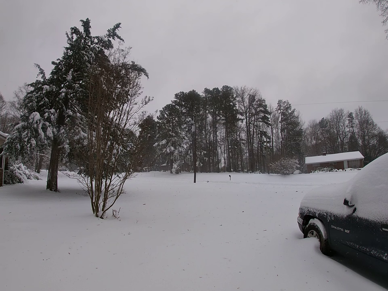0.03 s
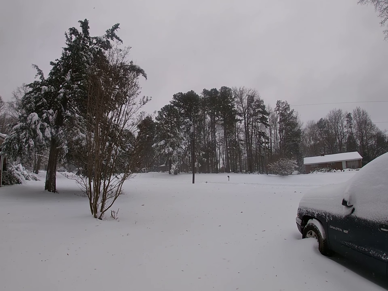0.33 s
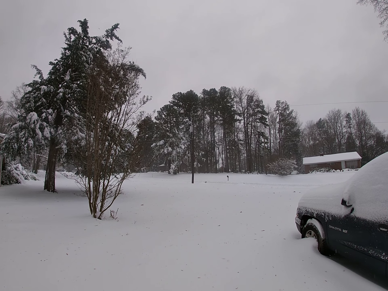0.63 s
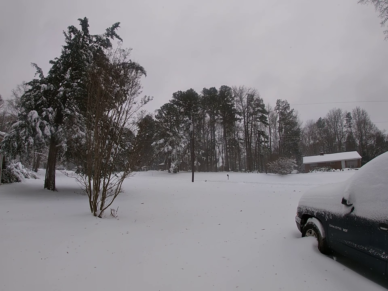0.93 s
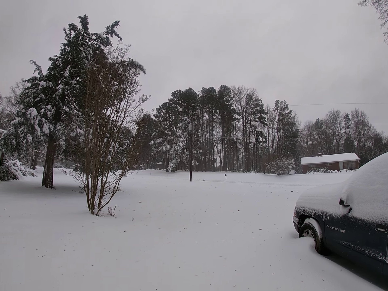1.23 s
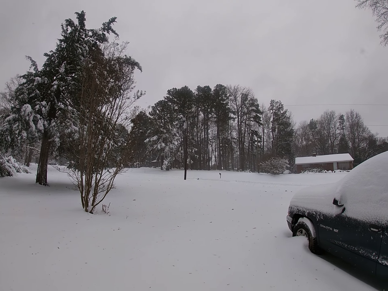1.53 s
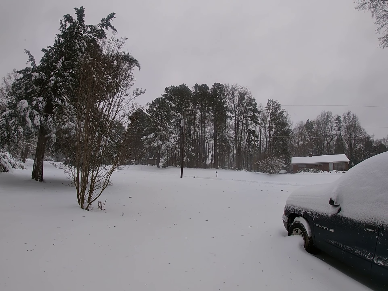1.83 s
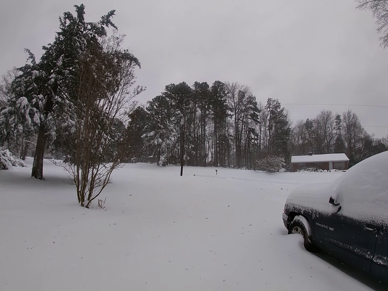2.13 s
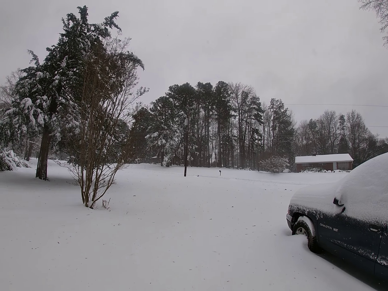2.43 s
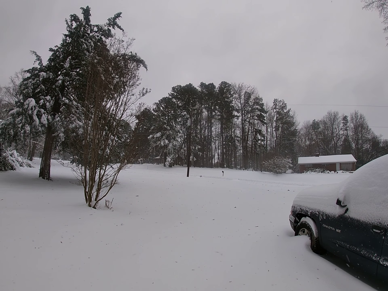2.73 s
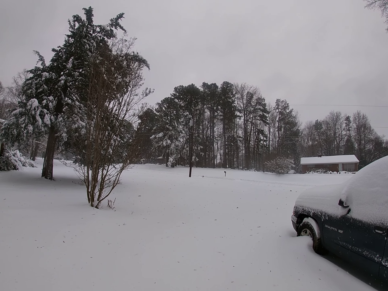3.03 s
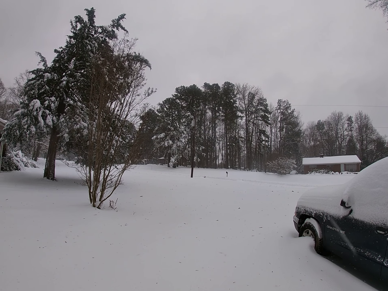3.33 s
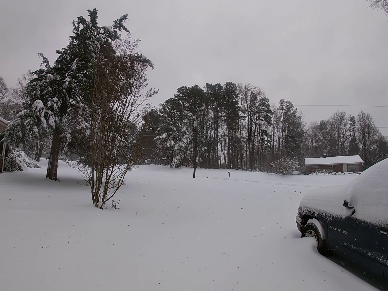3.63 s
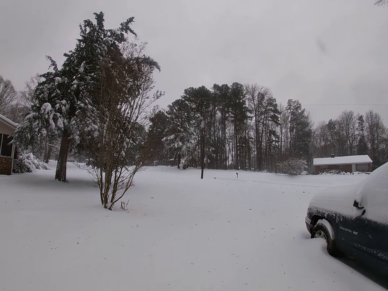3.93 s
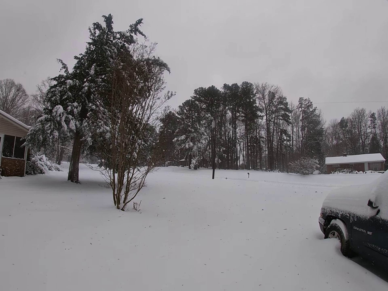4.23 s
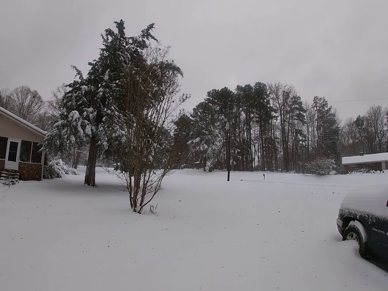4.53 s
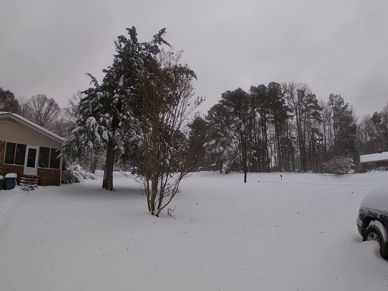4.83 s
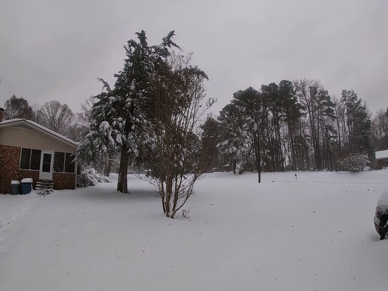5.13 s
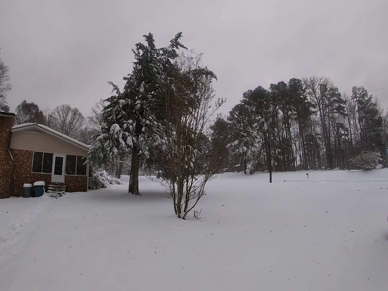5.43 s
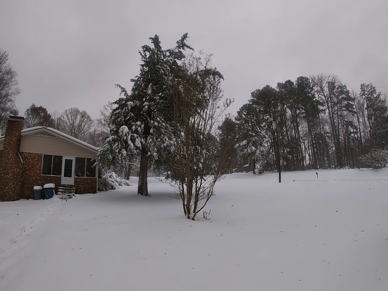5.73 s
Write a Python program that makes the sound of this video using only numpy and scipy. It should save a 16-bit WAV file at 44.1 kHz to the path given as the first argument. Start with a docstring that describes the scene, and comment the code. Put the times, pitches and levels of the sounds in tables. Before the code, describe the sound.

A soft hiss and fine patter of sleet on a snowy yard runs throughout, over a faint, steady, distant rumble. Right at the start an ice pellet hits the hand-held camera with a sharp, bright tick. More ticks follow irregularly, with a clear one at 1.1 seconds, the two loudest around 1.6 and 1.7, and another at 2.3. A low breeze creeps in at about 1.5 seconds, and from 2.5 seconds gusts buffet the microphone with deep thumps and flutter, peaking near 2.7 and 3.1. The wind eases around 3.6 seconds, while a flurry of grains and a run of ticks hit between 3.4 and 4. It then returns and stays strong and more fluttery until the end, near 6 seconds. Small flurries keep pattering against the microphone, with sharp ticks around 4.6 seconds and a cluster from 5.3 onward.

```python
"""Fine hiss and patter of sleet, with a sharp tick almost at once: a hand-held camera in a snowy yard.
Far pellets landing on snow merge into the hiss; near ones strike the casing, crumble and make it ring.
Over a faint far rumble, one wind rises in gusts: it buffets the microphone, flutters when strong
and drives flurries of grains onto it. The hardest ticks duck the gain."""
import sys
import numpy as np
from scipy import signal
from scipy.fft import rfft, irfft
from scipy.io import wavfile
from scipy.ndimage import uniform_filter1d, minimum_filter1d

SR = 44100
rng = np.random.default_rng(int(sys.argv[2]) if len(sys.argv) > 2 else 0)


def to_wav(s):
    """Save 16-bit WAV."""
    ch = np.atleast_2d(s).T  # columns
    pcm = np.round(np.clip(ch, -1, 1) * 32767)  # PCM
    wavfile.write(sys.argv[1], SR, pcm.astype(np.int16))


N = 259308
TIME_S = np.arange(N) / SR
FULL_GUST_DB = -21

# spectra: f/Hz, relative density/dB
SNOW_HISS_SPECTRUM = [(30, 6), (200, 11), (450, 6.5), (900, 4.5), (1250, 4.5), (1500, 4), (2200, 2.5),
                      (5200, 0), (7700, 3), (8300, -2), (9100, -11), (10400, -8), (11900, -25.5),
                      (13800, -22), (14800, -42), (16000, -58)]
RUMBLE_SPECTRUM = [(20, -20), (90, -18), (115, -2.5), (190, 6.5), (260, -4.5), (400, -23), (800, -67)]
SWELL_SPECTRUM = [(10, -19.5), (22, -0.5), (45, 3.5), (80, -3), (140, -15.5), (300, -38.5), (600, -79)]  # largest eddies
BUFFET_SPECTRUM = [(10, -45), (22, -24.5), (50, -1), (85, -0.5), (150, -3), (220, -8.5), (320, -18),
                   (500, -41), (900, -85)]  # thumps on the microphone
FLUTTER_SPECTRUM = [(100, -26), (220, -3), (330, 2.5), (450, -3), (600, -9), (800, -15.5), (1100, -21.5),
                    (1800, -41)]  # fast eddies
# resonances of casing and microphone port: f/Hz, width/Hz, level/dB
CASING_LOW_MODES = [(1407, 380, 3), (2150, 1970, 4), (3053, 960, 6), (4030, 990, 5), (4810, 530, 2.5)]
CASING_MID_MODES = [(5710, 1100, 1.1), (6340, 950, 2.1), (7680, 1310, 3.5)]
CASING_HIGH_MODES = [(9970, 1240, 3.4), (11270, 1500, 0.84), (12900, 720, 0.3)]
# grains blown against the camera: t/s, half length/s, level/dB
GRAIN_FLURRIES = [(2.767, 0.026, -43), (2.998, 0.03, -47), (3.777, 0.26, -49.5), (4.717, .09, -47.5),
                  (4.919, 0.078, -46), (5.218, 0.047, -46.5), (5.427, 0.054, -46), (5.87, 0.031, -46)]
# large pellets on the casing: t/s, level over 1 ms/dB, brightness/dB, crumble/ms, knock/Hz, ping/Hz
PELLET_HITS = [(0.0382, -13.5, 1.5, 1.1, 3450, 6870), (0.583, -31.5, -9, 1.4, 2700, 6700),
               (0.6354, -31.5, -4.5, 2.7, 3400, 7750), (0.8238, -24.5, 0, 0.62, 4100, 7940),
               (1.1246, -16.5, 2.5, 1.6, 4300, 7160), (1.5417, -27.5, 2, 0.89, 4730, 6600),
               (1.593, -25, -6, 3.6, 4800, 7400), (1.5982, -9.5, -5.5, 1.1, 4030, 7000),
               (1.6966, -7.5, 0.5, 0.12, 5600, 7740), (2.259, -12.5, -1, 1, 2970, 8200),
               (2.401, -21.5, -0.5, 0.43, 3060, 8050), (2.4366, -32, -2, .2, 4800, 6070),
               (2.7554, -33.5, -8, .2, 2820, 6900), (2.7836, -30, 0, .3, 4500, 6600),
               (2.9354, -30, -5, 0.25, 3680, 7600), (3.054, -29, -2, 0.22, 4670, 7260),
               (3.4498, -15.5, 0.5, 2.1, 3500, 7000), (3.5674, -24, -4.5, 1.1, 2470, 6700),
               (3.7444, -23.5, 3.5, 0.4, 4470, 8300), (3.801, -19, 4.5, 0.44, 4300, 7900),
               (3.9178, -17.5, 3, 0.59, 3070, 7840), (3.9302, -24, -3, 0.63, 4730, 7900),
               (4.0198, -15.5, -2, 1.6, 3600, 7400), (4.6055, -21, 2, 0.21, 3220, 7340),
               (4.6084, -20, 1.5, 0.097, 4650, 7100), (4.6616, -29.5, 2, 0.72, 4600, 6260),
               (5.3161, -24, -2, 2.6, 4600, 7900), (5.329, -19, -0.5, 1.4, 3080, 6560),
               (5.3751, -21.5, 8, 1.2, 3120, 7100), (5.461, -26.5, 1, 1.2, 4600, 7150),
               (5.47, -19.5, 3, .55, 4600, 6500), (5.473, -23.5, 3, .94, 2620, 7400),
               (5.667, -21.5, 2.5, 0.095, 4800, 7100), (5.781, -21.5, 0.5, 1.4, 3060, 7200),
               (5.8234, -20.5, 6, 0.13, 5000, 6560), (5.8534, -23, -5, 2.1, 4430, 6900)]
# wind at the microphone: t/s, level/dB
WIND_STRENGTH = [(0, -63), (1.15, -60.5), (1.3, -57.5), (1.64, -38), (2.36, -44.5), (2.47, -23.5),
                 (2.72, -19), (2.79, -30.5), (2.91, -34), (3.14, -18.5), (3.16, -22.5), (3.42, -24.5),
                 (3.6, -31.5), (4.0, -30), (4.08, -21.5), (4.56, -19.5), (5.13, -24.5), (5.41, -19),
                 (5.8, -23.5), (5.88, -23.5)]
# sudden buffets within gusts: t/s, half length/s, flutter boost/dB
SUDDEN_BUFFETS = [(2.58, 0.018, 6.5), (2.676, 0.025, 6.5), (3.095, 0.055, 3.5), (3.407, 0.024, 4.5),
                  (4.207, 0.033, 8.5), (4.777, 0.038, 6.5), (4.926, 0.036, 7)]
# treble roll-off of wind noise: f/Hz, gain/dB
WIND_ROLLOFF = [(1500, 0), (5000, -60)]
# difference between the two ports: f/Hz, side re middle/dB
PORT_DIFFERENCE = [(100, -43), (500, -43), (1000, -49), (2000, -46), (4000, -40.5), (8000, -38),
                   (11400, -28), (12100, -2.5), (14000, -4), (16000, -3)]


def amp(db):
    """Decibels to gain."""
    return 10 ** (np.asarray(db) / 20)


def unit(x):
    """Scale to rms 1."""
    return x / np.sqrt(np.mean(x ** 2) + 1e-20)


def filtered(x, curve):
    """Apply a gain curve of f/Hz, gain/dB."""
    hz, db = np.transpose(curve)
    gain_db = np.interp(np.log(np.fft.rfftfreq(N, 1 / SR) + 1), np.log(hz), db)
    return irfft(rfft(x) * amp(gain_db), N)


def noise(spectrum):
    """Coloured noise, rms 1."""
    return unit(filtered(rng.standard_normal(N), spectrum))


def wander(rate_hz):
    """Slow random motion, rms 1."""
    low_pass = np.exp(-(np.fft.rfftfreq(N, 1 / SR) / rate_hz) ** 2)
    return unit(irfft(rfft(rng.standard_normal(N)) * low_pass, N))


def hump(at_s, half_s):
    """Smooth rise and fall, height 1."""
    return np.exp(-((TIME_S - at_s) / half_s) ** 2)


def wind_db(lag_s=0):
    """Wind strength per sample, delayed by lag_s."""
    return np.interp(TIME_S - lag_s, *np.transpose(WIND_STRENGTH))


def grains(per_s, spread_db, max_spreads=3.1):
    """Random impacts, mostly small."""
    impulses = (rng.random(N) < per_s / SR) * rng.choice([-1, 1], N)
    return impulses * amp(spread_db * np.minimum(rng.exponential(1, N), max_spreads))


def snow_hiss(level_db=-46.5, fade_db_per_s=0.67, sway_db=0.6, crackle=0.43):
    """Countless far pellets merge into a slowly thinning hiss; nearer ones prickle through."""
    impacts = rng.standard_normal(N) + crackle * unit(grains(per_s=2200, spread_db=1.4))
    hiss = unit(filtered(impacts, SNOW_HISS_SPECTRUM))
    return hiss * amp(level_db - fade_db_per_s * TIME_S + sway_db * wander(12))


def tick(low_db, high_db, crumble_ms, knock_hz, ping_hz, focus_db, detune=0.028, chips=0.77, size=400):
    """Ice hits and crumbles; the casing rings briefly, the spot hit favouring some modes. Energy 1."""
    t = np.arange(size) / SR
    fragments = chips * rng.standard_normal(size) * (rng.random(size) < 0.25)
    blow = fragments * np.exp(-1000 * t / max(crumble_ms, 0.05))
    blow[0] = 1
    groups = [(CASING_LOW_MODES, low_db, knock_hz), (CASING_MID_MODES, 0, ping_hz),
              (CASING_HIGH_MODES, high_db, CASING_HIGH_MODES[0][0])]
    out = np.zeros(size)
    for modes, group_db, favoured_hz in groups:
        group = np.zeros(size)
        for hz, width_hz, db in modes:
            off_spot_db = focus_db * np.tanh(3 * abs(np.log2(hz / favoured_hz)))
            detuned_hz = hz * (1 + detune * rng.standard_normal())
            phase = 2 * np.pi * (detuned_hz * t + rng.random())
            ring = t * np.exp(-np.pi * width_hz * t) * np.sin(phase)
            group += amp(db - off_spot_db) * unit(np.convolve(blow, ring)[:size])
        out += amp(group_db) * unit(group)
    return out / np.linalg.norm(out)


def patter(calm_db=-54.5, gust_db=-54, calm_per_s=135, spots=24, crowding=0.6):
    """Fine grains hit spots on the casing, each its own colour; denser and harder in gusts and flurries."""
    power = amp(calm_db) ** 2 + amp(gust_db) ** 2 * amp(wind_db() - FULL_GUST_DB)
    for at_s, half_s, db in GRAIN_FLURRIES:
        power += amp(db) ** 2 * hump(at_s, half_s)
    crowd = (power / power.min()) ** crowding  # share of the rise due to more grains, not harder ones
    spot_per_s = calm_per_s * crowd * amp(2.5 * wander(14)) / spots
    out = np.zeros(N)
    for _ in range(spots):
        spot = tick(low_db=rng.normal(1.2, 5.1), high_db=rng.normal(-16, 2.8), crumble_ms=0.2,
                    knock_hz=rng.uniform(1140, 6400), ping_hz=rng.uniform(3500, 10000), focus_db=-1)
        impacts = grains(spot_per_s, spread_db=7.7, max_spreads=2.59)
        out += signal.oaconvolve(impacts, spot)[:N]
    return unit(out / np.sqrt(crowd)) * np.sqrt(power)


def far_rumble(level_db=-51):
    """Faint, steady low noise from afar."""
    return amp(level_db) * noise(RUMBLE_SPECTRUM)


def pellets(low_db=-3.5, high_db=-10.5, hard_db=-13.5, focus_db=14.5, hard_focus=1.5):
    """Large pellets strike the casing; above hard_db they ring more purely, mostly with the ping."""
    samples_per_ms = SR / 1000
    out = np.zeros(N)
    for at_s, db, bright_db, crumble_ms, knock_hz, ping_hz in PELLET_HITS:
        pure_db = max(db - hard_db, 0)
        ring = tick(low_db - bright_db - pure_db, high_db + bright_db - pure_db,
                    crumble_ms, knock_hz, ping_hz, focus_db + hard_focus * pure_db)
        span = out[round(at_s * SR):][:len(ring)]
        span += amp(db) * np.sqrt(samples_per_ms) * ring[:len(span)]
    return out


def sleet():
    """Ice on the camera and on the snow."""
    return pellets() + patter() + snow_hiss()


def turbulence(spectrum, lumps_db, window_samples=3600):
    """Lumpy noise, held near rms 1 over about 0.1 s."""
    lumpy = noise(spectrum) * amp(lumps_db)
    power = uniform_filter1d(uniform_filter1d(lumpy ** 2, window_samples), window_samples)
    return lumpy / np.sqrt(power + 1e-12)


def flutter_db(full_db=-38.5, slope=1.18, lag_s=0.023, turn_at_s=3.87, turn_length_s=0.84, turn_db=4):
    """Fast eddies trail the wind and grow faster than it; the camera turns and catches more of them."""
    turned = np.clip((TIME_S - turn_at_s) / turn_length_s, 0, 1)
    return full_db + slope * (wind_db(lag_s) - FULL_GUST_DB) + turn_db * turned


def wind(swell_db=-12, swell_slope=0.71, buffet_db=-1.28, thump_share=0.15):
    """A breeze sways the air slowly; stronger gusts thump the microphone and add fast flutter."""
    lumps, gust_db = wander(33.5), wind_db()
    sudden_db = sum(db * hump(at_s, half_s) for at_s, half_s, db in SUDDEN_BUFFETS)
    swell_onset = np.clip((gust_db + 65) / 16, 0.1, 1)
    buffet_onset = np.clip((gust_db + 58) / 26, 0.3, 1)
    swell_gain = swell_onset * amp(swell_slope * gust_db + swell_db)
    buffet_gain = buffet_onset * amp(gust_db + buffet_db + thump_share * sudden_db)
    swell = turbulence(SWELL_SPECTRUM, lumps) * swell_gain
    buffet = turbulence(BUFFET_SPECTRUM, 1.54 * lumps) * buffet_gain
    fast_lumps_db = 1.36 * lumps + 3.3 * wander(100)
    flutter = turbulence(FLUTTER_SPECTRUM, fast_lumps_db) * amp(flutter_db() + sudden_db)
    return filtered(swell + buffet + flutter, WIND_ROLLOFF)


def gain_control(x, threshold_db=-17, slope=0.91, recovery_db_per_s=130, window=44, hold_samples=900):
    """Gain ducks just after a hard tick, holds briefly and recovers."""
    treble = np.diff(x, prepend=0)  # detector is deaf to wind rumble
    power = abs(uniform_filter1d((treble ** 2).mean(0), window))
    over_db = slope * np.maximum(10 * np.log10(power + 1e-12) - threshold_db, 0)
    held_db = -minimum_filter1d(-over_db, hold_samples, origin=(hold_samples - 1) // 2)
    recovery_db = TIME_S * recovery_db_per_s
    duck_db = np.maximum.accumulate(held_db + recovery_db) - recovery_db
    late_duck_db = np.pad(uniform_filter1d(duck_db, window), (2 * window, 0))[:N]
    return x * amp(-late_duck_db)


def scene():
    """Two close ports hear everything alike, except the top treble of the sleet."""
    middle = sleet() + wind() + far_rumble()
    side = filtered(sleet(), PORT_DIFFERENCE)
    return np.array([middle + side, middle - side])


def record(dry, ceiling=0.9, asymmetry=0.071, cutoff_hz=16200):
    """Gain control, soft overload, band limit."""
    ducked = gain_control(dry)
    squashed = ducked / (1 + (ducked / ceiling) ** 6) ** (1 / 6)
    lopsided = squashed + asymmetry * squashed ** 2  # gives the hardest ticks a low knock
    low_pass = signal.firwin(255, cutoff_hz, window=("kaiser", 9), fs=SR)
    return signal.oaconvolve(lopsided, low_pass[None], "same")


dry = scene()
out = record(dry)
to_wav(out)
```